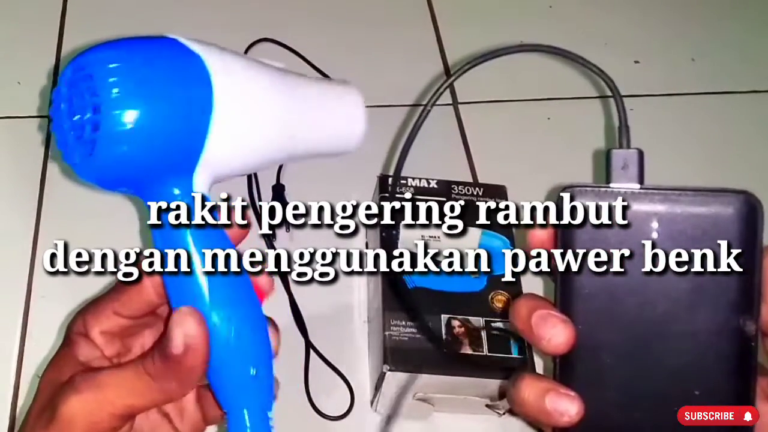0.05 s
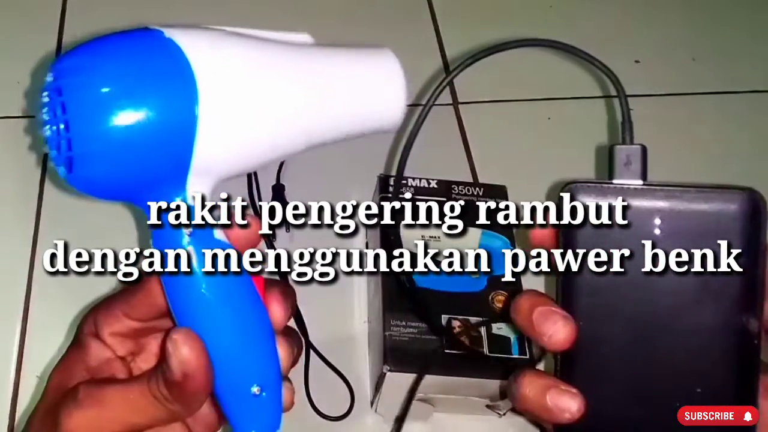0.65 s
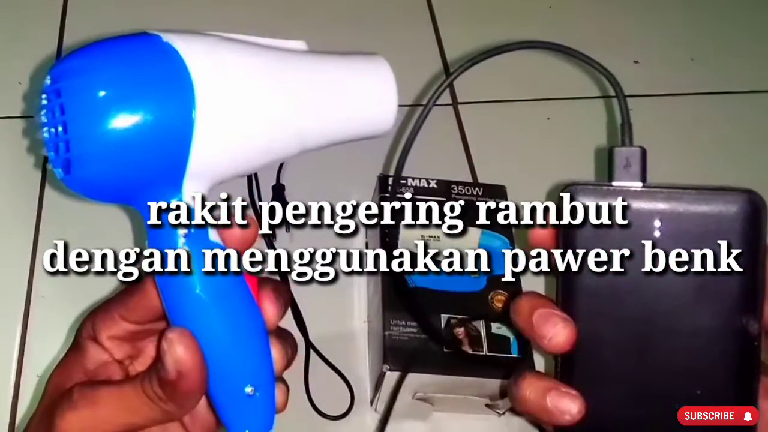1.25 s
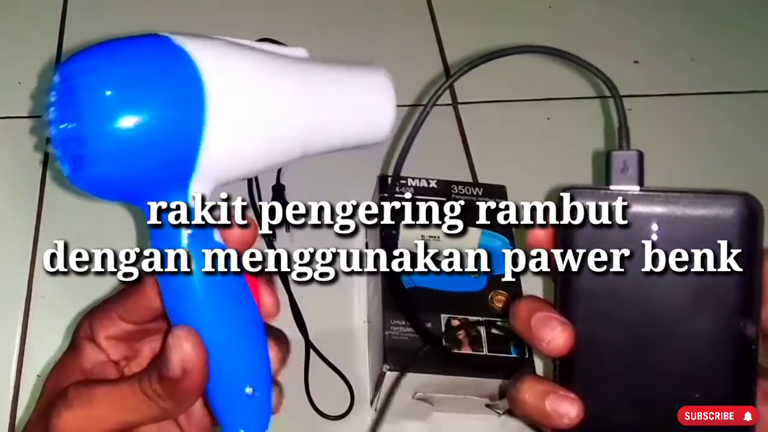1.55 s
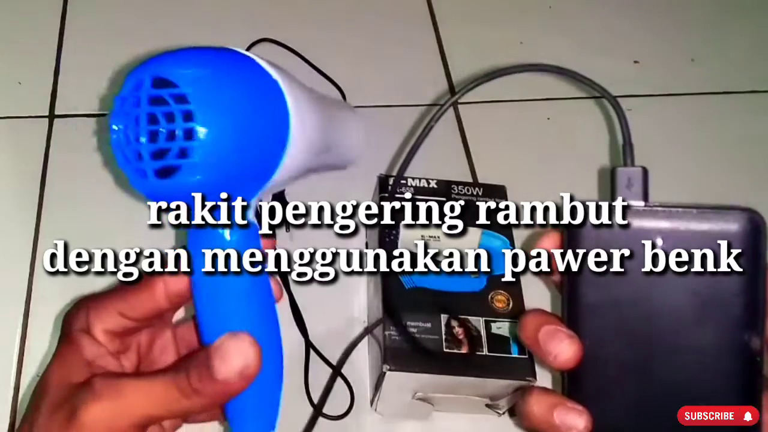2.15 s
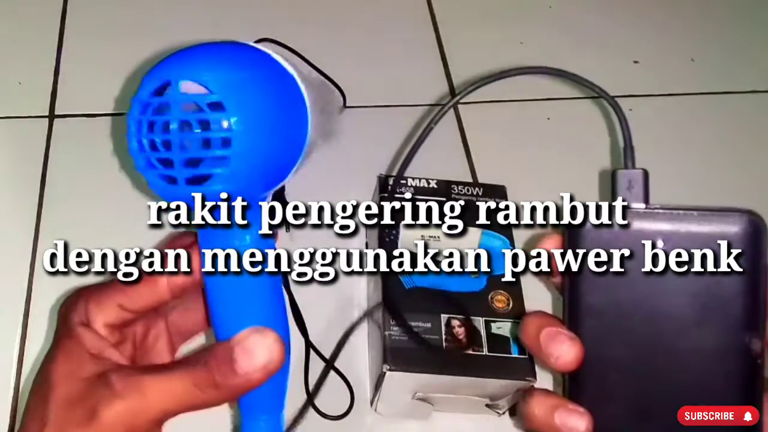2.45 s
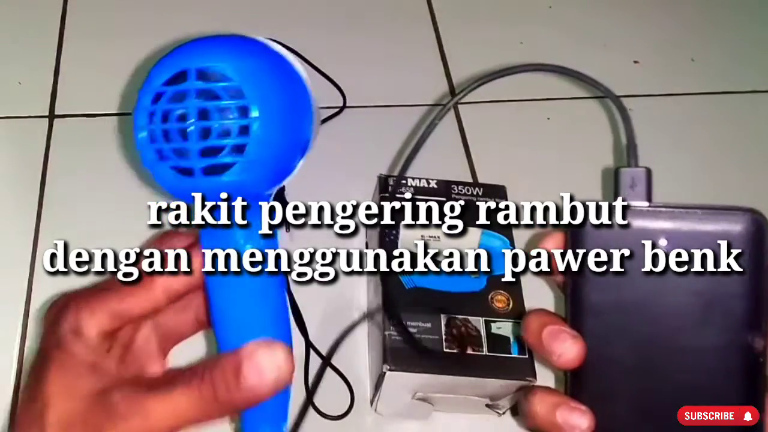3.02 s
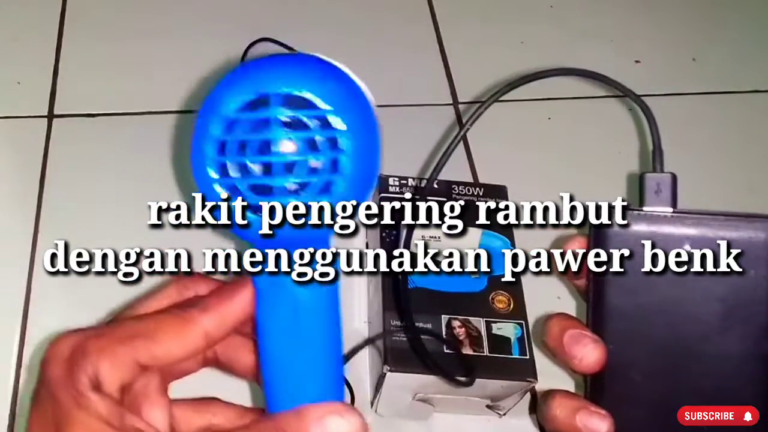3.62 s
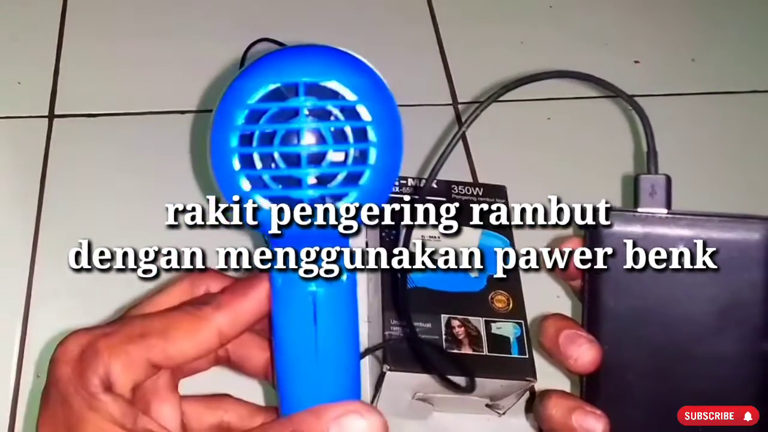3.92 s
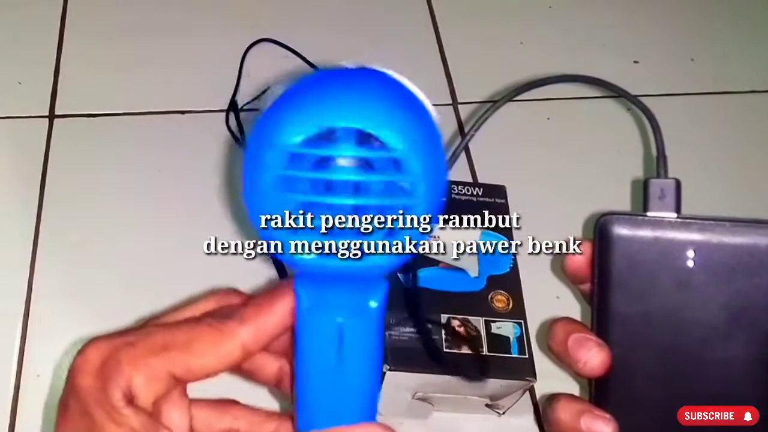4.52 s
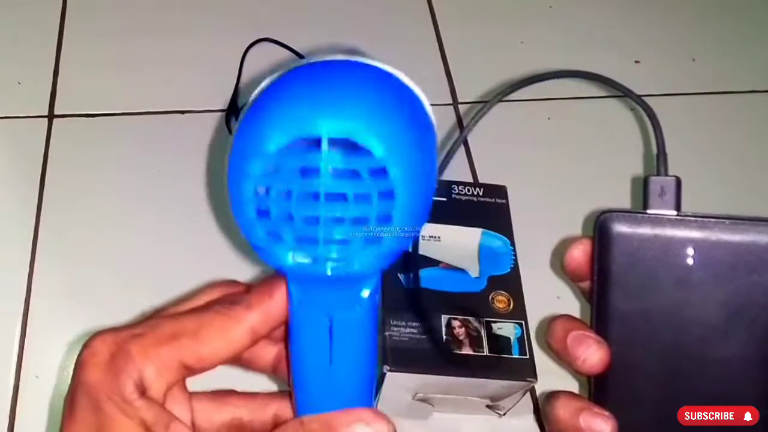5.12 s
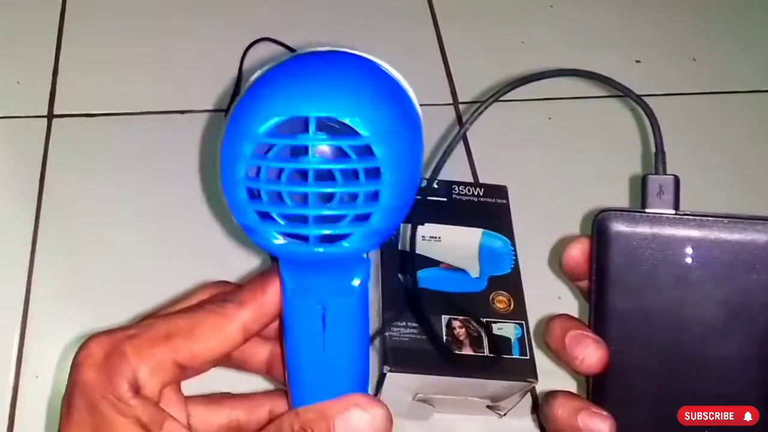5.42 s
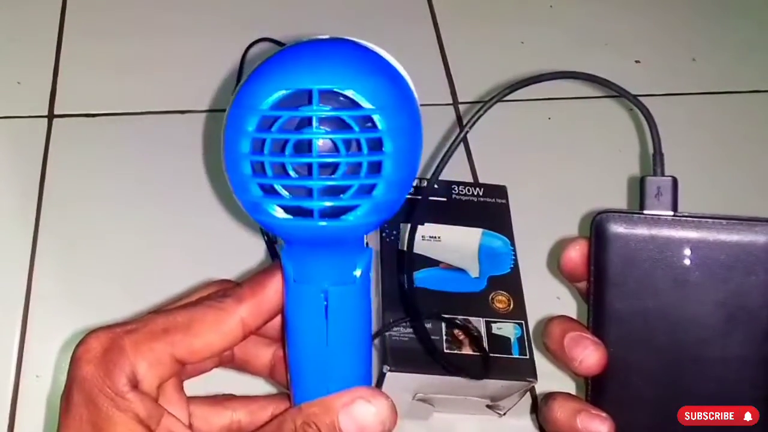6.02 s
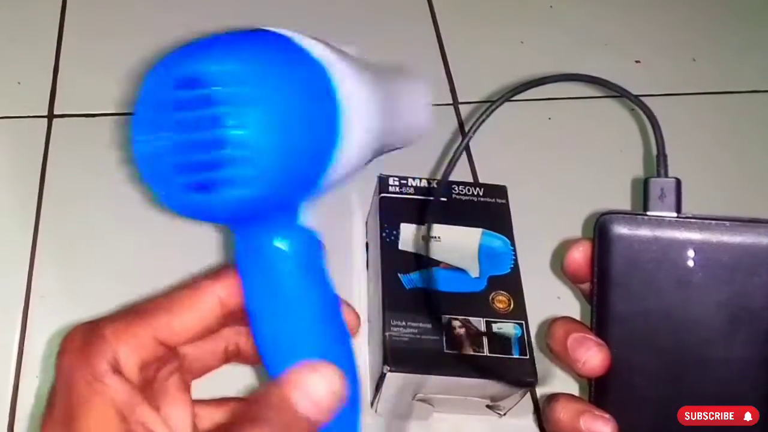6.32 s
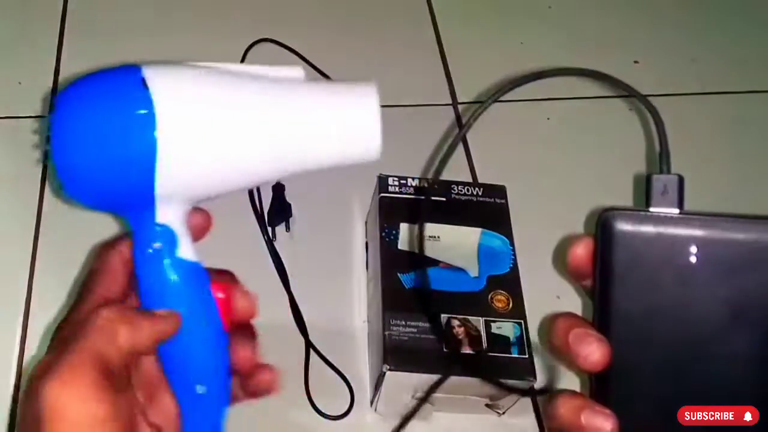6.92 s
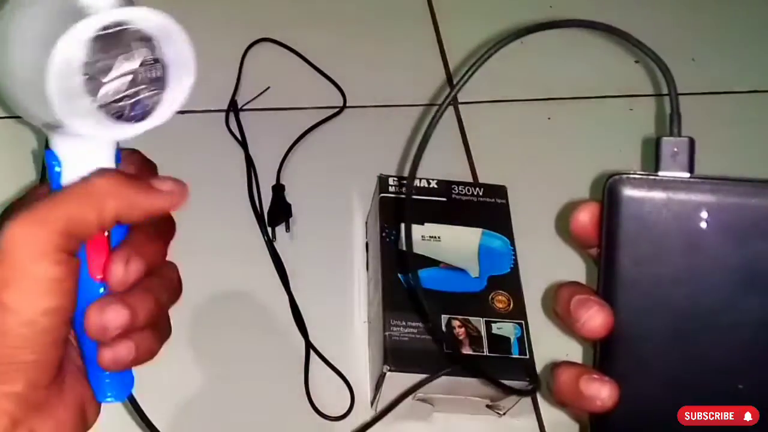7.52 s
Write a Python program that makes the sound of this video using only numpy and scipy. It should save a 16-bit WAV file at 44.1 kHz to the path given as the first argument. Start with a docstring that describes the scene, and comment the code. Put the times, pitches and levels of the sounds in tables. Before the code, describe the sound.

Close to the microphone in a tiled room with a faint low hum, a small hair dryer is clicked on and blows with a whining, slightly rattly motor. A sharp click cuts it and the fan coasts to a stop. Fingers rub lightly on plastic, the switch snaps twice, and the dryer starts again. It runs on, changing colour as it is turned in the hand, with soft low puffs of air on the microphone near the end.

```python
"""A small hair dryer, turned about in the hand over a tiled floor, is switched on, off and on again.
Its fan rushes air through the barrel; its DC motor whines and rattles once a turn.
The switch snaps and rings the plastic shell, and fingers slide on the handle in the pause.
Something hums low in the room, and at the end the jet brushes the microphone."""
import sys
import numpy as np
from scipy import signal
from scipy.fft import rfft, irfft, next_fast_len
from scipy.io import wavfile
from scipy.ndimage import uniform_filter1d

SR = 44100
rng = np.random.default_rng(int(sys.argv[2]) if len(sys.argv) > 2 else 0)


def to_wav(sig):
    """Store sig (one row per channel, or 1-D mono) as 16-bit WAV at the path in sys.argv[1].

    Samples outside -1..1 are clipped; the rate is SR.
    """
    pcm = np.clip(np.atleast_2d(sig), -1, 1) * 32767
    pcm = np.round(pcm).astype(np.int16)
    wavfile.write(sys.argv[1], SR, pcm.T)  # frames by channels


N = 341775
TIME = np.arange(N) / SR
HZ = np.maximum(np.arange(N // 2 + 1) * SR / N, 1)

# Motor power. Each row: on in seconds, off in seconds.
POWER_S = [(.479, 2.339), (5.135, 9)]
# Motor and fan tones. Each row: multiple of shaft speed, relative dB from side, intake, nozzle.
SHAFT_ORDERS = [(6, -62, -52, -51), (7, -53, -45, -53), (8, -55, -54, -58), (9, -49, -58, -55),
                (11, -66, -56, -55), (13, -64, -61, -56), (14, -57, -54, -62), (15, -50, -49, -49),
                (19, -56, -47, -60), (20, -60, -54, -65), (27, -59, -58, -58), (28, -57, -53, -48),
                (37, -57, -56, -61), (41, -56, -60, -61), (45, -61, -54, -52), (46, -63, -57, -59),
                (48, -61, -55, -57), (52, -59, -57, -57), (53, -56, -53, -56), (56, -61, -56, -62),
                (67, -58, -58, -59), (68, -59, -49, -60), (69, -60, -50, -63), (70, -62, -53, -63),
                (71, -57, -59, -58), (84, -61, -57, -57), (89, -69, -53, -62), (93, -63, -54, -64),
                (98, -66, -54, -64), (106, -59, -57, -62)]


def undb(db):
    """Decibels to gain."""
    return 10 ** (np.asarray(db) / 20)


def curves(table):
    """Each column of a time table, per sample."""
    times_s, *columns = np.transpose(table)
    return [np.interp(TIME, times_s, column) for column in columns]


def spectrum(table, column=1):
    """One column of a frequency table, joined on a log axis."""
    rows = np.array(table)
    return np.interp(np.log(HZ), np.log(rows[:, 0]), rows[:, column])


def bell(hz, width_hz, db):
    """One resonance bump in dB."""
    return db / (1 + (2 * (HZ - hz) / width_hz) ** 2)


def colour(x, db):
    """Zero-phase filter with a gain in dB per frequency."""
    size = next_fast_len(N)
    gain = undb(np.interp(np.arange(size // 2 + 1) * SR / size, HZ, db))
    return irfft(rfft(x, size) * gain, size)[:N]


def ring(x, db, size=2048):
    """Minimum-phase filter: resonances ring only after the blow."""
    gain = undb(np.interp(np.arange(size // 2 + 1) * SR / size, HZ, db))
    cepstrum = irfft(np.log(gain))
    cepstrum[1:size // 2] *= 2
    cepstrum[size // 2 + 1:] = 0
    return signal.oaconvolve(x, irfft(np.exp(rfft(cepstrum))))[:len(x)]


def white(count=N):
    """White noise of 0 dB per Hz."""
    return rng.standard_normal(count) * np.sqrt(SR / 2)


def unit(x):
    """Scale to rms 1."""
    return x / np.std(x)


def walk(rate_hz):
    """Smooth random drift, spread near 1."""
    points = uniform_filter1d(rng.standard_normal(1024), 2) * np.sqrt(2)
    return 1.2 * np.interp(TIME * rate_hz, np.arange(len(points)), points)


def swells(table):
    """Gain of Gaussian strokes."""
    return sum(undb(db) * np.exp(-2 * ((TIME - middle_s) / length_s) ** 2)
               for middle_s, length_s, db in table)


def blend(views, dbs):
    """Gain mixed from side, intake and nozzle levels."""
    return sum(weight * undb(db) for weight, db in zip(views, dbs))


def since_on(decay_s):
    """Jumps by 1 at each switch-on, then decays."""
    return sum((TIME >= on_s) * np.exp(-np.maximum(TIME - on_s, 0) / decay_s) for on_s, _ in POWER_S)


def hiss():
    """Soft room noise; its bands flicker independently."""
    # Noise floor. Each row: frequency in Hz, relative level in dB.
    floor = [(30, -102), (450, -88), (650, -91.5), (1000, -86), (1400, -89.5), (1900, -88), (2600, -88.5),
             (3600, -88.5), (6500, -100), (10000, -105), (13000, -113), (16000, -115)]
    # Faint resonances. Each row: centre in Hz, width in Hz, gain in dB.
    peaks = [(910, 110, 2.5), (1440, 120, 5), (1780, 450, 5), (5220, 150, -2)]
    edges_hz = [0, 450, 650, 850, 1100, 1400, 1750, 2200, 3000, 4500, SR]
    bins = rfft(white()) * undb(spectrum(floor) + sum(bell(*peak) for peak in peaks) - .46)
    return sum(irfft(bins * (HZ >= lo) * (HZ < hi), N) * undb(1.9 * walk(18))
               for lo, hi in zip(edges_hz, edges_hz[1:]))


def rumble():
    """Low noise coloured by room modes."""
    # Spectrum. Each row: frequency in Hz, relative level in dB.
    shape = [(20, -28.5), (40, -18), (62, -4), (100, 1.5), (130, 6), (165, 4.5), (200, -5.5), (236, 3.5),
             (275, -11.5), (315, -3.5), (400, -8), (600, -26), (1500, -28), (16000, -91)]
    # Room modes. Each row: centre in Hz, width in Hz, gain in dB.
    modes = [(137, 7.3, 4), (167, 5.2, 2), (226, 14, 2), (315.5, 9.3, 6.5)]
    # Envelope. Each row: time in seconds, level in dB.
    level = [(1.8, -48), (3, -49.5), (4.1, -46.5), (5.4, -43)]
    noise = unit(colour(white(), spectrum(shape) + sum(bell(*mode) for mode in modes)))
    return noise * undb(curves(level)[0])


def hums():
    """Two low hums, wavering in pitch and level."""
    # Envelopes. Each row: time in seconds, relative level in dB.
    lower = [(0, -50), (.38, -41), (.9, -57), (1.3, -46), (1.8, -44.5), (2.6, -61.5), (3.35, -68),
             (4, -47.5), (4.4, -56), (5.7, -47), (7.25, -44), (7.6, -48)]
    upper = [(0, -52), (1, -58.5), (2.1, -46.5), (2.8, -64.5), (5.2, -50), (5.75, -41.5), (6.62, -35),
             (7.2, -53)]
    out = 0
    for hz, level in [(80.5, lower), (111.5, upper)]:
        rms = undb(curves(level)[0] - 1 + 1.2 * walk(8))
        cycles = np.cumsum(hz * (1 + .0224 * walk(15))) / SR
        out += rms * np.sqrt(2) * np.sin(2 * np.pi * cycles)
    return out


def room(tone_hz=7634, tone_db=-67):
    """Rumble, hiss, hums and a thin steady tone."""
    return rumble() + hiss() + hums() + undb(tone_db) * np.sin(2 * np.pi * tone_hz * TIME)


def fingers():
    """Skin slips unevenly over smooth plastic."""
    # Friction spectrum. Each row: frequency in Hz, level in dB per Hz.
    skin = [(200, -105), (800, -92), (2000, -94.5), (5000, -91.5), (7500, -97), (10500, -95.5),
            (13000, -103), (16000, -102)]
    # Strokes. Each row: middle in seconds, length in seconds, gain in dB.
    slides = [(2.982, 0.033, -1), (3.18, 0.13, 5), (3.52, 0.22, -2.5), (3.67, 0.071, 0.5),
              (3.988, 0.031, 5)]
    slip_db = 1.5 * walk(40)
    return colour(white(), spectrum(skin)) * swells(slides) * undb(slip_db)


def buffeting():
    """The jet sweeps over the microphone port and flutters it."""
    # Gusts. Each row: middle in seconds, length in seconds, level in dB.
    gusts = [(6.43, .07, -49), (7.55, .4, -61), (7.7, .1, -37.5)]
    eddy_db = spectrum([(15, -35), (60, 3), (130, -1), (400, -13), (2000, -50), (16000, -88)])
    return unit(colour(white(), eddy_db)) * swells(gusts) * undb(2 * walk(20))


def switch(count=24000, click_t60_s=.008, echo_rise_s=.006):
    """Each snap rings the shell briefly; floor and walls answer."""
    # Snaps and ticks. Each row: start in seconds, relative level in dB, t60 in seconds,
    # echo gain in dB, then gain in dB at each shell mode.
    snaps = [(0.2998, -59.5, 0.031, -11.5, 2, 6.6, 11, 2, 7.5, 19.4, 4, -7.5, 15),
             (.402, -76.5, 0.024, -1.5, 3, 6.4, 5, 6, -8, 9.1, -6, -2, -2),
             (.4795, -54, 0.031, -13, 4, 1, 2, 6.5, -2.5, 9.7, 2.5, 7, 4.5),
             (2.3391, -54, 0.035, -13.5, -9, 11.7, 8, 1.5, 4, 8.5, 4, 2, 13),
             (4.303, -52.5, 0.036, -12, 1.5, 2.5, 7.5, -1, -3.5, 6.5, -1, 3, 1),
             (4.968, -83.5, 0.056, 0, -5, 7.9, 17, 1, 4, 1.1, -6, 2, -11),
             (4.978, -78.5, 0.062, -9, 1, 7.1, 13, -3, -6, 3, -9, -3, -16.5),
             (5.1273, -71.5, 0.027, -2.5, 3, 7.7, 9, -2, -2, 9.2, -6, 6, -3),
             (5.135, -53, 0.028, -13.5, -0.5, 0.5, -3, -1.5, -7, 3, 5.5, 3.5, -5)]
    # Shell modes. Each row: centre in Hz, width in Hz.
    shell = [(760, 510), (1250, 1530), (1950, 500), (3400, 770), (4900, 780), (6480, 510), (8750, 1400),
             (9700, 1200), (12500, 7800)]
    # Snap spectrum. Each row: frequency in Hz, gain in dB.
    snap_shape = [(100, -23), (300, -16), (500, -1.5), (900, 1), (2700, 0), (5500, 1), (10000, 0.5),
                  (13500, -15.5), (16000, -7.5)]
    # Tiled room decay, one row per band. Each row: nominal frequency in Hz, t60 in seconds.
    room_decay = [(400, 0.35), (1500, 0.3), (6000, 0.34), (14000, 0.27)]
    edges_hz = [0, 900, 3000, 10000, SR]
    bin_hz = np.arange(count // 2 + 1) * SR / count
    out, t = np.zeros(N + count), np.arange(count) / SR
    for start_s, db, t60_s, echo_db, *mode_dbs in snaps:
        crack = white(count) * (undb(-60 * t / t60_s) + 1.1 * undb(-60 * t / click_t60_s))
        echo_bins = rfft(white(count))
        tail = sum(irfft(echo_bins * (bin_hz >= lo) * (bin_hz < hi)) * undb(-60 * t / room_t60_s)
                   for lo, hi, (_, room_t60_s) in zip(edges_hz, edges_hz[1:], room_decay))
        echo = undb(echo_db) * tail * (1 - np.exp(-t / echo_rise_s))
        shell_db = sum(bell(*mode, mode_db) for mode, mode_db in zip(shell, mode_dbs))
        start = int(start_s * SR)
        out[start:start + count] += ring(crack + echo, spectrum(snap_shape) + shell_db + db - 1.5)
    return out[:N]


def throttle(spin_up_s=.068, coast_s=.48):
    """Share of full speed: the rotor spins up fast, then coasts down against air and friction."""
    share = np.zeros(N)
    for on_s, off_s in POWER_S:
        rise = 1 - np.exp(-np.maximum(TIME - on_s, 0) / spin_up_s)
        share += rise * np.clip(1 - (TIME - off_s) / coast_s, 0, 1) ** 1.05
    return share


def rattle(turns, patterns=4, size=4096):
    """Brushes and bearing scrape the same bumps every turn; the pattern drifts slowly."""
    order = np.arange(size // 2 + 1)
    heard = (order > 9) & (order < 130) & ~np.isin(order, np.array(SHAFT_ORDERS)[:, 0])
    out = 0
    for _ in range(patterns):
        bumps = irfft(rfft(rng.standard_normal(size)) * heard)
        out += walk(2.5) * np.interp(turns % 1 * size, np.arange(size), bumps)
    return unit(out) * np.sqrt(SR / 2)


def motor(turns, share, views):
    """Brushes hiss at the commutator gaps and rattle near full speed; both ring the motor can."""
    # Brush spectrum. Each row: frequency in Hz, relative level in dB.
    brush = [(200, -105), (1000, -105), (2300, -83), (4000, -92), (6000, -89.5), (9000, -86),
             (12000, -86.5), (15500, -86)]
    # Can modes. Each row: centre in Hz, width in Hz, gain in dB.
    can = [(3530, 170, 5), (4630, 120, -2.5), (5076, 56, 14), (5720, 60, 11), (6470, 400, 11),
           (6970, 160, 4.5), (8400, 430, 8), (9440, 240, 2.5), (10280, 200, 2.5)]
    # Leakage through the grilles: gain in dB from side, intake, nozzle.
    scrape_db = (-2, 0, -2)
    clatter_db = (-1.5, 4, .5)
    gaps = 1 + .25 * np.cos(2 * np.pi * turns) + .35 * np.cos(2 * np.pi * turns * 4)
    scrape = white() * gaps * np.sin(np.pi / 2 * share) * blend(views, scrape_db)
    clatter = rattle(turns) * share ** 11 * blend(views, clatter_db)
    return colour(scrape + clatter, spectrum(brush) + sum(bell(*mode) for mode in can))


def whine(turns, share, views):
    """Shaft-locked tones build near full speed; uneven inflow flutters the low ones most."""
    out = 0
    for order, *dbs in SHAFT_ORDERS:
        flutter = np.interp(order, [8, 30], [.5, .25]) * walk(14)
        amplitude = np.sqrt(2) * blend(views, dbs) * (1 + flutter) / np.sqrt(1 + np.var(flutter))
        treble_db = np.interp(order, [15, 28], [0, 1.3])
        out += amplitude * undb(treble_db) * np.sin(2 * np.pi * (order * turns + rng.random()))
    return out * share ** 18


def airflow(share, views):
    """Fan turbulence grows steeply with speed and sounds the barrel modes."""
    # Air spectrum. Each row: frequency in Hz, dB per Hz from side, intake, nozzle.
    air = [(99, -87.5, -95, -78), (300, -82.5, -76.5, -76.5), (550, -77.5, -77, -76), (1150, -71, -75, -76),
           (2150, -87, -81.5, -77.5), (3580, -84.5, -81.5, -77.5), (5300, -88, -84.5, -82.5),
           (7000, -92, -85, -83.5), (9500, -93.5, -77.5, -78), (11900, -104, -77.5, -78),
           (15500, -82.5, -77, -76)]
    # Barrel modes. Each row: centre in Hz, width in Hz, gain in dB from side, intake, nozzle.
    barrel = [(927, 259, 17, 19.8, 10.7), (1330, 130, 0.5, 2.7, 5.6), (1867, 210, 12, 14.2, 6.7),
              (2410, 160, 3.5, 5, 1.3), (2925, 320, 15, 11.3, 7.2), (4025, 400, 11, 8.9, 8.4),
              (4850, 250, 4, 6, 3.9), (5030, 250, 5, 8, 5.2), (6130, 280, -4, 6, 6.5),
              (6170, 350, -3.5, 3, 3.3), (8570, 240, -2, 11, 2.3)]
    eddies = white() * undb(.6 * walk(25)) * share ** 2.74
    out = 0
    for k, weight in enumerate(views):
        modes_db = sum(bell(hz, width_hz, dbs[k]) for hz, width_hz, *dbs in barrel)
        out += weight * colour(eddies, spectrum(air, column=k + 1) + modes_db)
    return out


def dryer(shaft_hz=124.03, surge_db=8.5):
    """One shaft drives air, motor noise and tones; turning the dryer changes their mix."""
    # End facing the microphone. Each row: time in seconds, aspect (-1 nozzle, 0 side, 1 intake).
    aspect = [(1.5, -0.31), (1.9, 0.23), (2.3, 0.88), (6.25, 0.94), (6.5, 0.49), (6.8, 0.024),
              (7.08, -0.45), (7.22, -1)]
    # Movement in the hand. Each row: time in seconds, gain in dB of air, motor noise, tones.
    movement = [(.9, -0.9, -0.5, -2), (1.8, -0.7, 1.5, -0.6), (2.3, -1.1, -0.5, 1), (5.55, 0, -2, -.5),
                (6.2, 1, -1, 0.5), (6.5, 2, -3, 3), (6.8, .5, 4.5, 2), (7.1, -.5, 4, -1.5),
                (7.35, 0, -4, 2.5), (7.75, 0, 1, 1.5)]
    share = throttle()
    creep = .015 * since_on(decay_s=.45)  # the last bit of speed comes slowly
    tremble = .0003 * walk(6) + .000472 * walk(40)
    turns = np.cumsum(shaft_hz * share * (1 - creep + tremble)) / SR
    facing = np.clip(curves(aspect)[0], -1, 1)
    views = [1 - abs(facing), np.maximum(facing, 0), np.maximum(-facing, 0)]  # side, intake, nozzle
    air_db, motor_db, tones_db = curves(movement)
    motor_db += surge_db * since_on(decay_s=.13)  # starting current makes the brushes louder
    return (airflow(share, views) * undb(air_db)
            + motor(turns, share, views) * undb(motor_db)
            + whine(turns, share, views) * undb(tones_db))


def scene():
    """All sources at one microphone."""
    return (dryer() + switch() + fingers() + room() + buffeting())[None]


def record(dry, drive=1.2, top_hz=15500):
    """The microphone port rings near 15 kHz and dips near 8 kHz; peaks are rounded, the top is cut."""
    port_db = bell(14700, 600, 10.5) + bell(15280, 600, 10.5) + bell(7940, 433, -7)
    rounded = np.tanh(drive * ring(dry[0], port_db)) / drive
    lowpass = signal.ellip(12, .2, 70, top_hz, fs=SR, output="sos")
    return signal.sosfilt(lowpass, rounded)[None]


dry = scene()
out = record(dry)
to_wav(out)
```